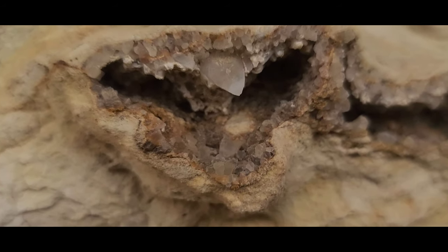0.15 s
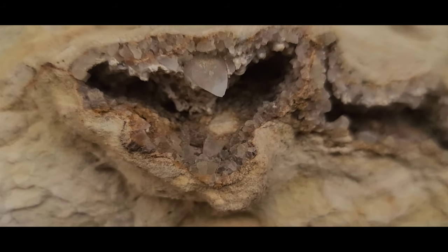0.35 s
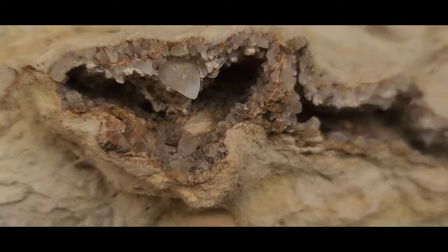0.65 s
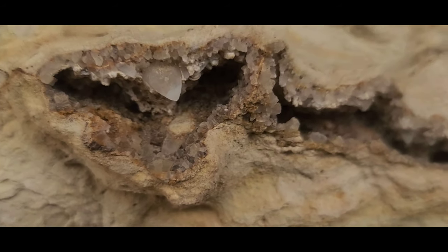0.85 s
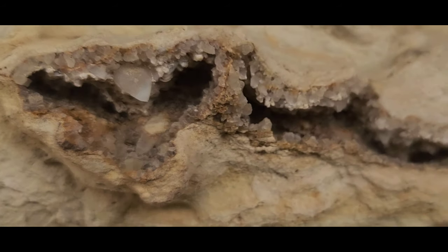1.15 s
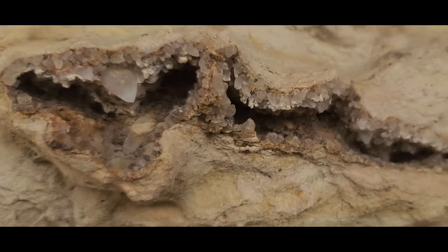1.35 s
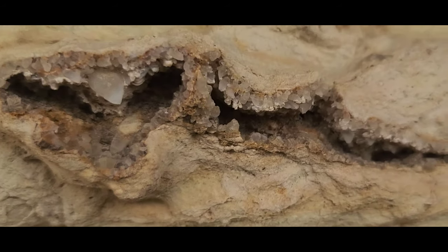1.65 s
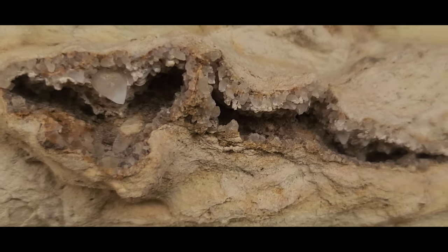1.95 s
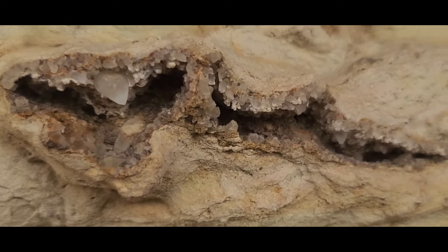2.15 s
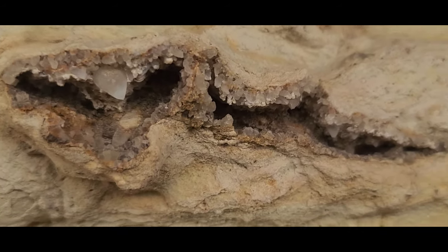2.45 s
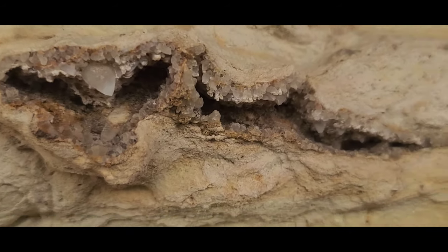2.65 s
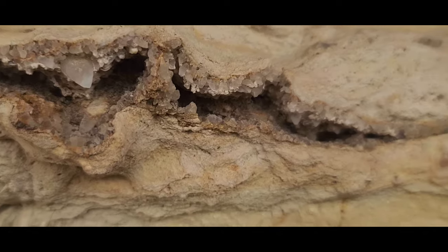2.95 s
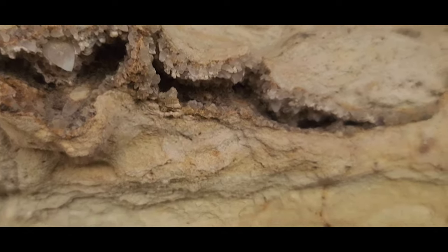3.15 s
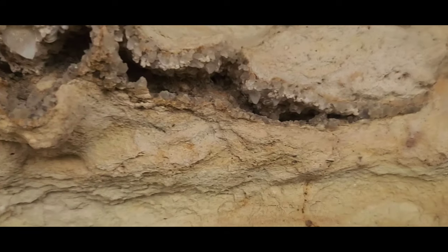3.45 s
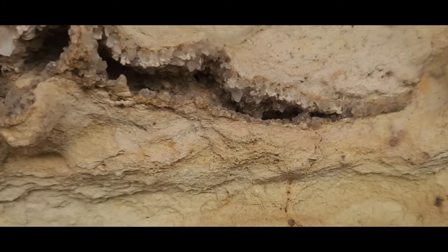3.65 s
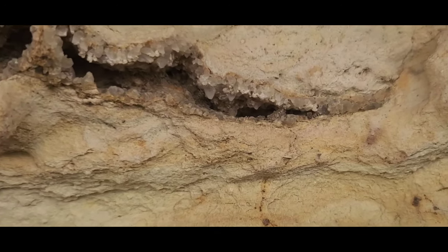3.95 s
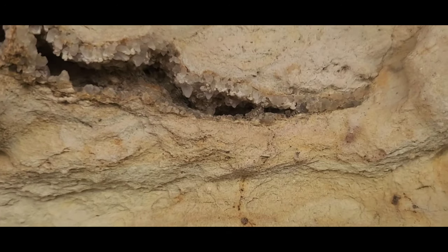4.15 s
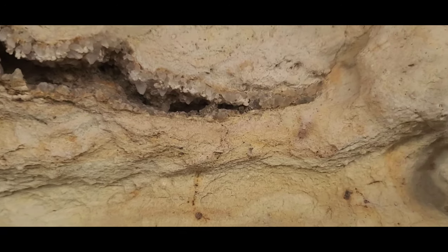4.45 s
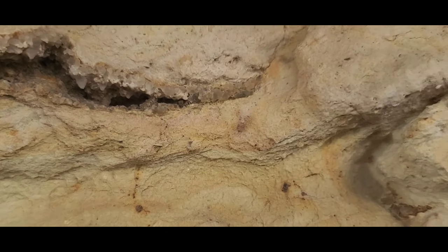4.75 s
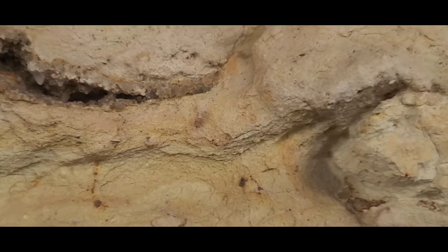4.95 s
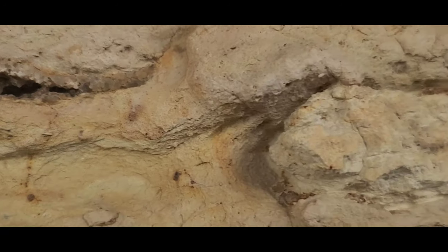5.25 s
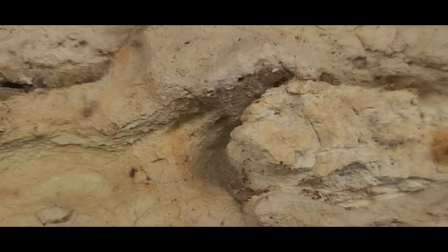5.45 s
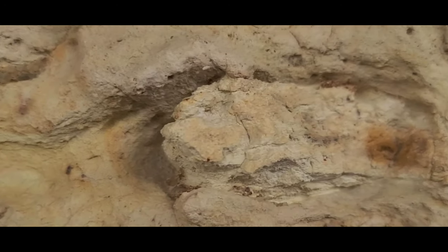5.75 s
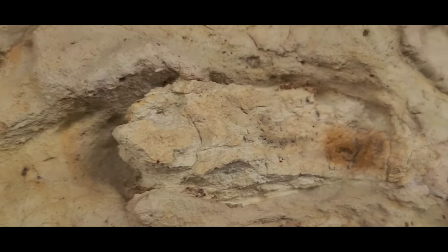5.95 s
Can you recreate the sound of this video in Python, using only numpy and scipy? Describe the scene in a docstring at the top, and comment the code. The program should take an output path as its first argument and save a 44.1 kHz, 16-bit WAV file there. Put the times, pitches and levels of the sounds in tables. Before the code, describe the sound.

Close, wide stereo in a cramped, quiet cave, with still air and a faint low rumble throughout; the bright contacts lean right. At 0 to 0.2 s three quick stone clacks, the third strongest, ring briefly and hollow over a short slide of grit. Pebbles tick at about 0.1 and 0.4 s, and the grit thins away. Faint dull bumps come at 1.05 to 1.35 s and a small gritty shift at 1.87 s. A pebble ticks at 2.3 s, then a sharp clack at 2.5 s and a heavy dull bump at 2.9 s. Softer bumps at 3.2 to 3.4 s lead to the loudest, hardest clack at 3.7 s, with a softer, brighter one at 3.9 s. Small bumps follow at 4.2 s, a barely audible wavering low tone near 4.7 s and a weak clack at 5.26 s. From 5.35 s a faint airy hiss swells, breaks off around 5.8 s and returns, among three dull bumps.

```python
"""Loose rocks are shifted in a cramped, quiet cave, over still air with a faint low rumble.
Three clacks open it, each with a small hollow ringing; pebbles tick and the sliding grit soon thins out.
Heavy stones then rock with dull bumps, a clack among them, up to the hardest clack and a softer one after it.
A few more bumps, a faint wavering low tone and a weak clack lead to an airy hiss that breaks off and returns.
Blows are short noise bursts through stone resonances plus decaying sines; grit, hiss and air are shaped noise."""
import sys
import numpy as np
from scipy import signal
from scipy.io import wavfile
from scipy.ndimage import uniform_filter1d

SR = 44100
rng = np.random.default_rng(int(sys.argv[2]) if len(sys.argv) > 2 else 0)


def unload_audio(sound):
    """Save the sound as a 16-bit wav file, at the path given as the first command line argument."""
    columns = np.transpose(np.atleast_2d(sound))
    # keep every value between -1 and 1, then stretch to whole-number steps
    steps = np.round(np.clip(columns, -1, 1) * 32767)
    wavfile.write(sys.argv[1], SR, steps.astype(np.int16))


N = 268569
TIME = np.arange(N) / SR             # scene time, s
AGE = np.arange(SR // 4) / SR        # time since the start of a blow, s
EAR_LAG_S = 0.0005                   # stones lie to the right: the left side hears bright contacts later
STIR_SPREAD_DB = 2                   # faint random events vary by up to this much either way


def from_db(db):
    """Decibels to gain."""
    return 10 ** (np.asarray(db) / 20)


def rms_one(x):
    """Scale to rms 1."""
    return x / np.sqrt(np.mean(x ** 2) + 1e-20)


def unit_blow(x):
    """Scale a blow to the energy of 30 ms at rms 1."""
    return rms_one(x) * np.sqrt(0.03 / AGE[-1])


def at_hz(points, hz):
    """Read a spectrum on a log-frequency axis."""
    f, value = np.array(points).T
    return np.interp(np.log(hz), np.log(f), value)


def band(x, low_hz, high_hz, order=3):
    """Causal band-pass."""
    edges = [low_hz, min(high_hz, 0.45 * SR)]
    return signal.sosfilt(signal.butter(order, edges, "band", fs=SR, output="sos"), x)


def resonance(x, hz, width_hz):
    """One resonance with gain 1 on top."""
    r = np.exp(-np.pi * width_hz / SR)
    feed = np.array([1, 0, -1]) * (1 - r * r) / 2
    return signal.lfilter(feed, [1, -2 * r * np.cos(2 * np.pi * hz / SR), r * r], x)


def stereo_noise(alike, size):
    """White noise whose left and right have a given likeness (correlation)."""
    mid, side = rng.standard_normal((2, size))
    alike = np.clip(alike, -1, 1)
    return np.sqrt((1 + alike) / 2) * mid + np.sqrt((1 - alike) / 2) * side * [[1], [-1]]


# stereo width of the steady noises, columns: f/Hz, left-right likeness (1 = identical)
STEREO_LIKENESS = [(60, 0.93), (200, 0.56), (400, 0), (700, 0), (15000, 0.0)]


def coloured(spectrum):
    """Steady stereo noise, built from half-octave bands to a spectrum in dB per Hz; rms 1."""
    edges = 20 * 2 ** np.arange(0, 10.1, 0.5)
    noise = np.zeros((2, N))
    for low, high in zip(edges, edges[1:]):
        hz = np.sqrt(low * high)
        white = stereo_noise(at_hz(STEREO_LIKENESS, hz), size=N)
        noise += from_db(at_hz(spectrum, hz)) * band(white, low, high, order=2)
    return rms_one(noise)


def gains(curve):
    """The dB columns of a curve as gains in time, silent outside its span."""
    t, *columns = np.transpose(curve)
    inside = (TIME > t[0] - 0.02) & (TIME < t[-1] + 0.02)
    fade = uniform_filter1d(1.0 * inside, SR // 50)   # 20 ms ramps
    return [fade * from_db(np.interp(TIME, t, db)) for db in columns]


def above(gain, rest_db):
    """The part of a level that exceeds a resting level, taken as power."""
    return np.sqrt(np.maximum(gain ** 2 - from_db(2 * rest_db), 0))


def add(out, s, blow, right_db, lag_s):
    """Pan a blow by level (positive right_db = louder right) and by a lag of the left side."""
    for channel, delay, gain_db in ((0, lag_s, -right_db / 2), (1, 0, right_db / 2)):
        start = min(N, max(0, round((s + delay) * SR)))
        part = blow[channel, :N - start]
        out[channel, start:start + len(part)] += from_db(gain_db) * part


def at_random(per_s, db, pitches_hz, activity):
    """Rows (t/s, level/dB, f/Hz) of faint events; they crowd where the activity is high."""
    when, size, pitch = rng.random((round(per_s * N / SR), 3)).T
    low, high = pitches_hz
    s = np.interp(when, np.cumsum(activity) / np.sum(activity), TIME)
    return zip(s, db + STIR_SPREAD_DB * (2 * size - 1), low * (high / low) ** pitch)


def contact(crush_s, walls_db, t60, alike):
    """Rough faces crush together for a few ms; close walls return a dense, short tail."""
    crush = AGE / crush_s * np.exp(1 - AGE / crush_s)
    tail = from_db(walls_db - 60 * AGE / t60) * (1 - np.exp(-AGE / crush_s))
    direct = crush * stereo_noise(alike, size=len(AGE))
    return direct + tail * stereo_noise(alike ** 3, size=len(AGE))   # the tail is wider


# modes the stones ring with, columns: f/Hz, width/Hz, gain of that resonance/dB
STONE_MODES = [(217.6, 32, 11.5), (409, 31, 8), (570.6, 70, -0.5), (1333, 40, 7), (1500, 62, 1),
               (2166, 70, 7.5), (2314, 68, 6.5), (2770, 90, 3.5), (3015, 110, 9), (3565, 70, 7),
               (4290, 160, 3.5), (5780, 1800, 5), (11900, 860, 4)]


def stone(x):
    """The modes of the stones stand out of the broad contact sound."""
    for hz, width_hz, db in STONE_MODES:
        x = x + (from_db(db) - 1) * resonance(x, hz, width_hz)
    return x


def ring(hz, t60, rise_s):
    """A mode that swells briefly and dies away."""
    decay = from_db(-60 * AGE / t60)
    return unit_blow(np.sin(2 * np.pi * hz * AGE) * decay * (1 - np.exp(-AGE / rise_s)))


def thud():
    """Weight settles into the ground: a low, nearly mono contact."""
    weight = contact(crush_s=0.0061, walls_db=-6, t60=0.16, alike=0.93)
    return unit_blow(band(weight, 34, 140, order=2))


# still air with a low rumble, columns: f/Hz, level/dB per Hz
AIR_SPECTRUM = [(20, -13.5), (45, -6), (70, 1.5), (95, -6), (135, -16.5), (210, -11), (320, -19),
                (500, -22), (1000, -21), (3000, -26.5), (5500, -35), (8000, -41.5), (11000, -29.5),
                (15000, -32)]
AIR_DB = -68


def air():
    """Steady noise, strongest in the low rumble, leaning slightly to the right."""
    return from_db(AIR_DB) * coloured(AIR_SPECTRUM) * from_db([[-1.2], [1.2]])


GROAN_S, GROAN_HALF_S = 4.68, 0.094                      # centre and Gaussian sigma of the swell
GROAN_HZ, GROAN_WIDTH_HZ, GROAN_DB = 403, 60, -70.5      # width of each resonance; level at the centre


def groan():
    """A faint low tone, noise through two equal resonances, swells, wavers and fades."""
    tone = stereo_noise(0.88, size=N)
    for _ in range(2):
        tone = resonance(tone, GROAN_HZ, GROAN_WIDTH_HZ)
    swell = np.exp(-0.5 * ((TIME - GROAN_S) / GROAN_HALF_S) ** 2)
    return from_db(GROAN_DB) * swell * rms_one(tone)


SCRAPE_REST_DB, GRIND_REST_DB = -82, -79.5   # below these curve levels the grit lies still
# grit under the shifting stones, columns: t/s, scrape level/dB, grinding level/dB (before rest and trims)
GRIT_MOVEMENT = [(0.0, -63, -57.5), (0.06, -70, -71.5), (0.23, -74.5, -77), (0.66, -77.5, -77),
                 (1.58, -79, -78), (1.86, -71.5, -70.5), (2.0, -82, -77.5), (2.7, -82, -81.5),
                 (3.14, -80, -79), (3.73, -73.5, -69.5), (4.4, -80, -76), (4.72, -80, -74.5),
                 (5.04, -81.5, -79.5), (5.25, -78.5, -73)]


def movement():
    """Strength of the scraping and of the grinding while the stones shift."""
    scrape, grind = gains(GRIT_MOVEMENT)
    return above(scrape, SCRAPE_REST_DB), above(grind, GRIND_REST_DB)


SCRAPE_TRIM_DB, GRIND_TRIM_DB = 3, 0.5
HISS_TRIM_DB, AIRY_BAND_TRIM_DB, HISS_LOW_TRIM_DB = 4.5, -0.5, 1   # grainy noise, airy band, low noise
AIRY_BAND_HZ = 1730
GRAINS_PER_S, GRAIN_DECAY_S = 220, 0.0076
# a faint airy hiss that swells, breaks off and returns,
# columns: t/s, hiss level/dB, airy band level/dB (before trims)
AIRY_HISS = [(5.33, -80, -83.5), (5.464, -71.5, -70.5), (5.576, -72, -73), (5.686, -65.5, -68),
             (5.778, -72.5, -59.5), (5.82, -85, -85), (6.08, -68, -69.5)]
# colour of the grit and of the hiss, columns: f/Hz, level/dB per Hz
GRIT_SPECTRUM = [(600, -14), (1100, -0.5), (1700, -1), (3000, -2.5), (4800, -5), (6500, -7.5),
                 (8500, -12.5), (13000, -10.5), (16000, -14.5)]
# colour of the low noise under both, columns: f/Hz, level/dB per Hz
GRIND_SPECTRUM = [(100, -25), (200, 0), (400, -4), (700, -6.5), (1200, -11), (2500, -52)]


def sliding_and_hiss(scrape, grind):
    """Sliding grit and an airy hiss share grainy and low noise; the hiss adds a narrow band near 1.7 kHz."""
    hiss, airy_band = gains(AIRY_HISS)
    grainy_gain = from_db(SCRAPE_TRIM_DB) * scrape + from_db(HISS_TRIM_DB) * hiss
    low_gain = from_db(GRIND_TRIM_DB) * grind + from_db(HISS_LOW_TRIM_DB) * hiss
    # random grain hits of uneven size, each dying away exponentially
    sizes = from_db(4.3 * np.minimum(rng.exponential(1, N), 3))
    hits = (rng.random(N) < GRAINS_PER_S / SR) * sizes
    grains = rms_one(signal.lfilter([1], [1, -np.exp(-1 / (GRAIN_DECAY_S * SR))], hits + 1e-18))
    grainy_noise = grainy_gain * coloured(GRIT_SPECTRUM) * (0.61 + 0.55 * grains)
    narrow = resonance(stereo_noise(0.18, size=N), AIRY_BAND_HZ, 380)
    narrow = rms_one(resonance(narrow, AIRY_BAND_HZ, 340))
    narrow_noise = from_db(AIRY_BAND_TRIM_DB) * airy_band * narrow
    return grainy_noise + narrow_noise + low_gain * coloured(GRIND_SPECTRUM)


SNAP_DB, SNAP_AT_HZ, SNAP_DB_PER_OCTAVE = -18, 3500, 6   # higher pebbles snap more brightly


def tick(hz):
    """A pebble touches lightly, with a pitch of its own and a snap on top."""
    touch = contact(crush_s=0.0017, walls_db=0.5, t60=0.12, alike=0.14)
    body = from_db(-15) * unit_blow(band(stone(touch), hz / 2.15, hz * 2.07, order=2))
    note = from_db(-21) * unit_blow(resonance(touch, hz, 150))
    snap_db = SNAP_DB + SNAP_DB_PER_OCTAVE * np.log2(hz / SNAP_AT_HZ)
    return body + note + from_db(snap_db) * unit_blow(band(touch, 4300, 16800, order=1))


CRUMBS_PER_S, CRUMB_DB, CRUMB_HZ = 6.1, -64.5, (1420, 5000)   # average rate, blow gain, pitch range
# single pebbles, columns: t/s, level/dB (gain on the tick), f/Hz
PEBBLES = [(0.0865, -43, 5000), (0.298, -53.5, 1150), (0.3724, -42.5, 3240), (0.432, -55, 3960),
           (1.2298, -55.5, 4900), (1.866, -49, 1300), (2.3328, -45.5, 2260), (2.959, -56, 4000),
           (4.13, -50, 4970), (5.22, -52, 4080), (5.4675, -55.5, 5740)]


def ticks(scrape):
    """A few pebbles drop clearly; faint crumbs fall at random, more often where the grit scrapes."""
    out = np.zeros((2, N))
    crumbs = at_random(CRUMBS_PER_S, CRUMB_DB, CRUMB_HZ, scrape)
    for s, level_db, hz in [*PEBBLES, *crumbs]:
        add(out, s, from_db(level_db) * tick(hz), right_db=2.0, lag_s=EAR_LAG_S)
    return out


def bump(hz, knock_db):
    """A heavy stone meets its bed: a soft, dull contact, a low note and a knock."""
    push = stone(contact(crush_s=0.0028, walls_db=-4, t60=0.14, alike=0.78))
    body = from_db(-11.5) * unit_blow(band(push, 146, 429))
    note = from_db(-10) * ring(hz, t60=0.073, rise_s=0.001)
    knock = contact(crush_s=0.0035, walls_db=-5.5, t60=0.14, alike=0.15)
    return body + note + from_db(knock_db - 8.5) * unit_blow(band(knock, 456, 810))


THUD_UNDER_BUMP_DB = -18   # the ground's thud against the bump's level
ROCK_S = 0.023             # a tipped stone falls back this much later
PINCH_HZ = 2095            # pitch of the grit caught under it
NUDGES_PER_S, NUDGE_DB, NUDGE_HZ = 4, -63, (168, 400)   # average rate, blow gain, pitch range
# heavy stones rocking, columns: t/s, level/dB (gain on the bump), f/Hz, knock/dB before an 8.5 dB cut,
# pinched grit/dB against its bump, fall back/dB against the first bump
ROCKING_STONES = [(1.056, -58, 214, -11, -4, -21), (1.228, -56.5, 566, -4, -9, -18.5),
                  (1.331, -59, 208, -20, -6, -4), (1.864, -55, 322, -9.5, -5.5, -14),
                  (2.217, -50.5, 225, -35.5, -32, -18), (2.787, -62, 235, -24, -16, 0.5),
                  (2.9, -38.5, 243, -9.5, -8.5, -9), (3.175, -54, 217, -8, -5, -3.5),
                  (3.279, -52.5, 255, -12.5, -18, -21), (3.43, -47, 229, -3.5, 1.5, -2),
                  (4.15, -59.5, 487, 0, -1, -1), (4.21, -57.5, 568, 2, 5, -19),
                  (4.84, -55.5, 193, -5, -13.5, -14), (5.671, -42.5, 336, -3.5, -20, -21),
                  (5.799, -46.5, 210.5, -14.5, -21.5, -7.5), (5.926, -48.5, 742, -3, -8.5, 2)]


def bumps(grind):
    """Heavy stones tip, shake the ground and fall back, pinching grit each time; others are barely nudged."""
    out = np.zeros((2, N))
    for s, level_db, hz, knock_db, grit_db, back_db in ROCKING_STONES:
        add(out, s, from_db(level_db + THUD_UNDER_BUMP_DB) * thud(), right_db=0.5, lag_s=0)
        for at, db in ((s, level_db), (s + ROCK_S, level_db + back_db)):
            add(out, at, from_db(db) * bump(hz, knock_db), right_db=0.5, lag_s=0.0001)
            add(out, at, from_db(db + grit_db) * tick(PINCH_HZ), right_db=3.5, lag_s=EAR_LAG_S)
    for s, db, hz in at_random(NUDGES_PER_S, NUDGE_DB, NUDGE_HZ, grind):
        add(out, s, from_db(db) * bump(hz, knock_db=-16), right_db=-5.0, lag_s=0.0001)
    return out


THUD_UNDER_CLACK_DB = -11   # the ground's thud against the clack's thump
RING_SHARE = 0.72           # split of the hollow: this energy weight to the tone, the rest to the rattle
HOLLOW_LAG_CYCLES = 0.43    # the left side gets the hollow's wave later, in nearly opposite phase
CRACK_DB, CRACK_LOW_DB = -10, -13.5   # crack at 2-4.5 kHz; in the band below, before its share of the loss
CRACK_LOW_LOSS = 0.3        # a duller crack also loses this share of its treble loss in its lowest band
REBOUND_S = 0.016           # a struck stone drops back on its seat this much later
# band edges of the thump (first two) and of the crack (third onwards), column: f/Hz
CLACK_BAND_EDGES = [180, 450, 1150, 2000, 4500, 9000, 16000]


def clack_thump():
    """The low push of two stones meeting, with the ground's thud under it."""
    push = stone(contact(crush_s=0.0035, walls_db=-6.5, t60=0.1, alike=0.93))
    thump = unit_blow(band(push, CLACK_BAND_EDGES[0], CLACK_BAND_EDGES[1]))
    return thump + from_db(THUD_UNDER_CLACK_DB) * thud()


def hollow_rattle(hollow_hz):
    """Contact noise coloured by the hollow between the stones."""
    noise = band(contact(crush_s=0.0017, walls_db=-1.5, t60=0.1, alike=0.25), 460, 820)
    return np.sqrt(1 - RING_SHARE) * unit_blow(resonance(noise, hollow_hz, 210))


def hollow_ring(hollow_hz):
    """The standing wave in the hollow rings on as a tone, stronger on the right."""
    tone = ring(hollow_hz, t60=0.069, rise_s=0.0024)
    return np.sqrt(RING_SHARE) * tone * np.array([[0.7], [1.2]])


def crack(loss_db):
    """Bright crushing noise in bands; higher bands die sooner and a duller crack has less of them."""
    edges = CLACK_BAND_EDGES
    low_db = CRACK_LOW_DB - CRACK_LOW_LOSS * loss_db
    band_dbs = [low_db, *(CRACK_DB - loss_db * np.arange(len(edges[4:])))]
    out = np.zeros((2, len(AGE)))
    for db, low, high in zip(band_dbs, edges[2:], edges[3:]):
        t60 = 0.082 * (3000 / low) ** 0.12
        crush = stone(contact(crush_s=0.0016, walls_db=-3, t60=t60, alike=0.16))
        out += from_db(db) * unit_blow(band(crush, low, high, order=4))
    return out


def rebound():
    """A lighter contact as the struck stone drops back."""
    drop = stone(contact(crush_s=0.0013, walls_db=-2, t60=0.064, alike=0.43))
    return unit_blow(band(drop, 900, 7400, order=1))


# stone on stone, columns: t/s, level/dB (gain on the blow), hollow f/Hz, stone note f/Hz, then against the level:
# thump/dB, hollow/dB before trims, rebound/dB; treble loss/dB per crack band going up from 2 kHz
STONE_CLACKS = [(0.0098, -33.5, 718, 1920, -11.5, -7.5, -21, 6.5),
                (0.1138, -38, 674, 2890, -40, -8.5, -31, 1.2),
                (0.1901, -26, 725.5, 1996, -21.5, -7, -30, 5),
                (2.4753, -22.5, 764, 2220, -19.5, -16, -25, 3.5),
                (3.6784, -13, 708, 2100, -28, -8.5, -32.5, 11),
                (3.8857, -29, 719.4, 2950, -27, -5, -12, 1.1),
                (5.259, -41.5, 701, 3760, -14.5, -8, -18.5, 6)]


def clacks():
    """Hard blows: a low thump, the hollow between the stones, a bright crack, the stone's own note and a rebound."""
    out = np.zeros((2, N))
    for s, level_db, hollow_hz, note_hz, thump_db, hollow_db, rebound_db, loss_db in STONE_CLACKS:
        add(out, s, from_db(level_db + thump_db) * clack_thump(), right_db=-0.5, lag_s=0.0003)
        hollow = from_db(level_db + hollow_db + 4) * hollow_ring(hollow_hz)
        add(out, s, hollow, right_db=2.5, lag_s=HOLLOW_LAG_CYCLES / hollow_hz)
        blow = from_db(hollow_db - 2) * hollow_rattle(hollow_hz) + crack(loss_db)
        blow += from_db(-17.5) * ring(note_hz, t60=0.044, rise_s=0.0006)
        add(out, s, from_db(level_db) * blow, right_db=3.5, lag_s=EAR_LAG_S)
        drop = from_db(level_db + rebound_db) * rebound()
        add(out, s + REBOUND_S, drop, right_db=1.0, lag_s=EAR_LAG_S)
    return out


def scene():
    """Stones, gravel, grit and an airy hiss over the still air of the cave."""
    scrape, grind = movement()
    background = air() + groan()
    return background + sliding_and_hiss(scrape, grind) + ticks(scrape) + bumps(grind) + clacks()


CUTOFF_HZ = 15700


def record(dry):
    """The top is cut steeply by an elliptic low-pass."""
    return signal.sosfilt(signal.ellip(10, 0.1, 80, CUTOFF_HZ, fs=SR, output="sos"), dry)


dry = scene()
out = record(dry)
unload_audio(out)
```